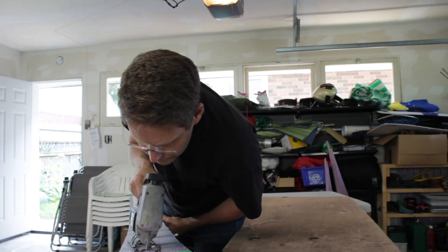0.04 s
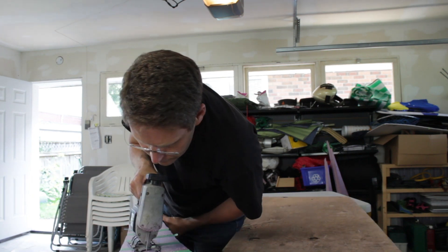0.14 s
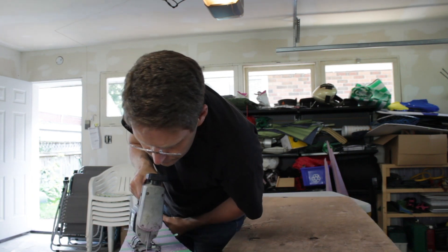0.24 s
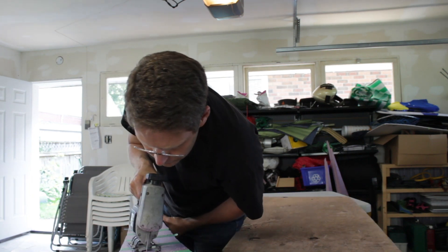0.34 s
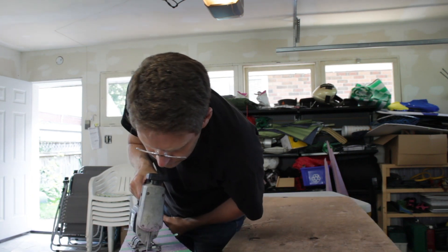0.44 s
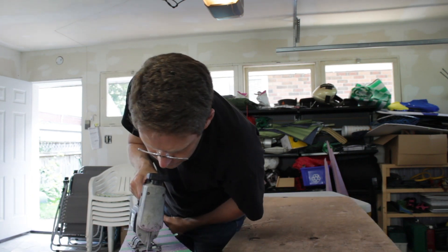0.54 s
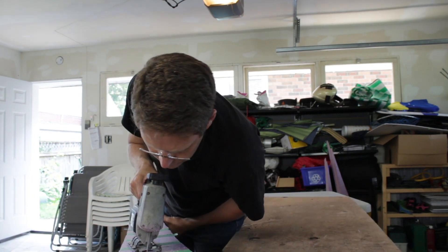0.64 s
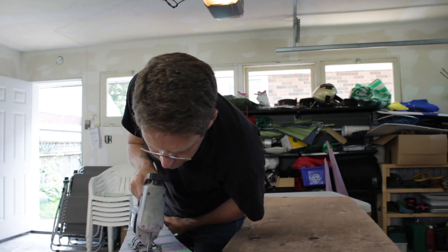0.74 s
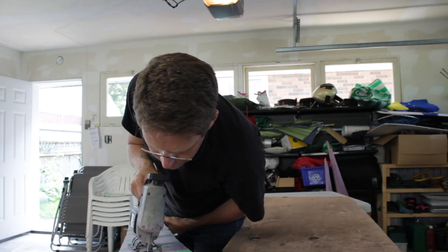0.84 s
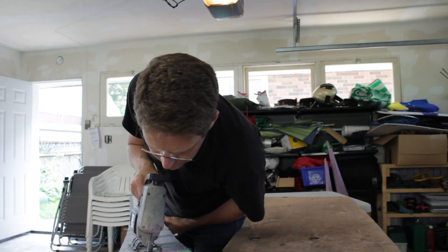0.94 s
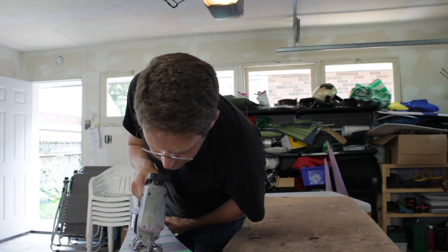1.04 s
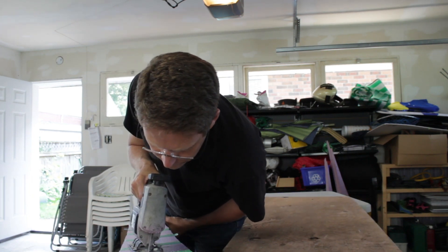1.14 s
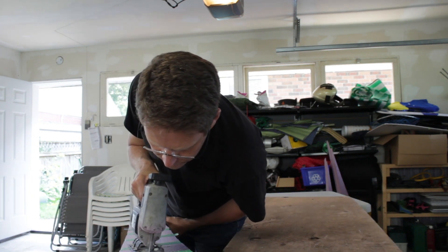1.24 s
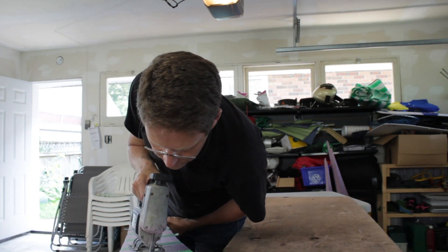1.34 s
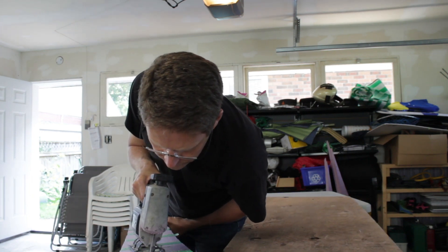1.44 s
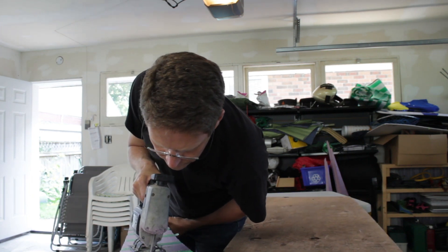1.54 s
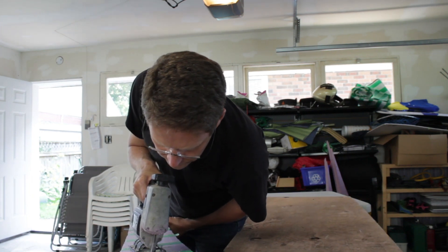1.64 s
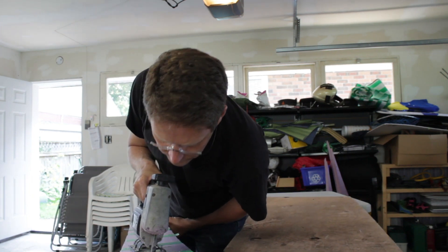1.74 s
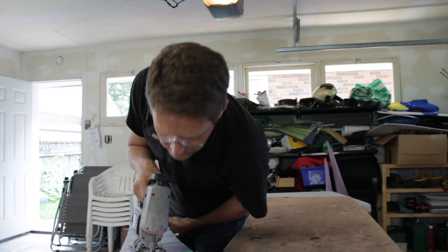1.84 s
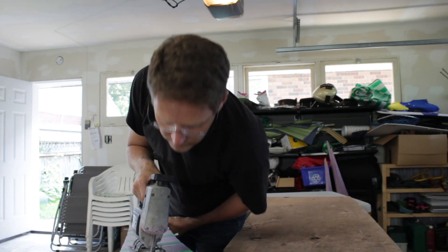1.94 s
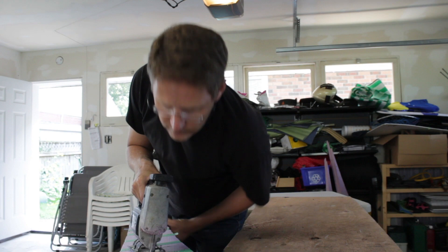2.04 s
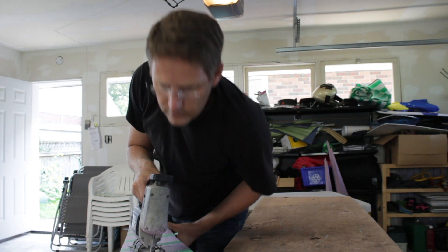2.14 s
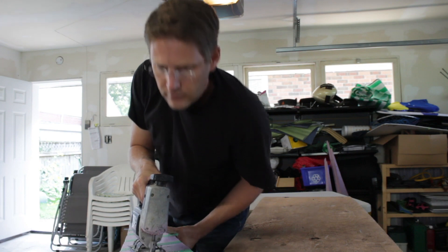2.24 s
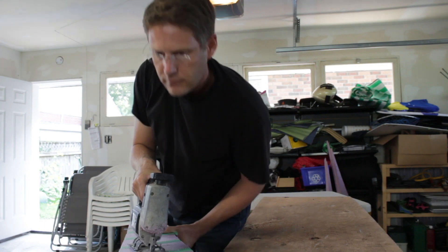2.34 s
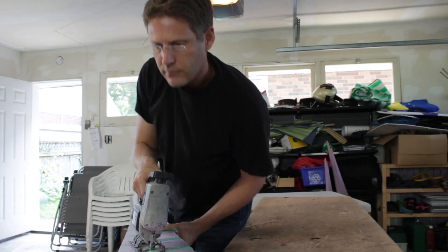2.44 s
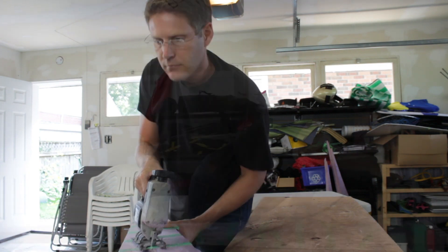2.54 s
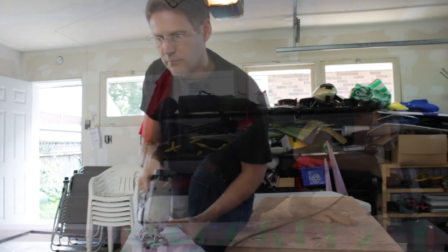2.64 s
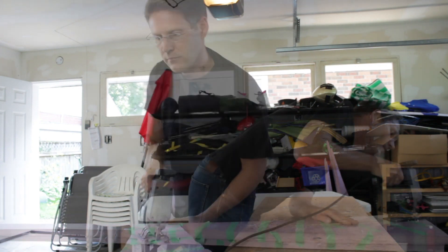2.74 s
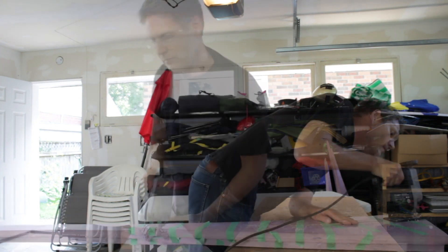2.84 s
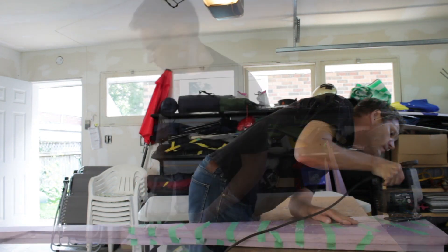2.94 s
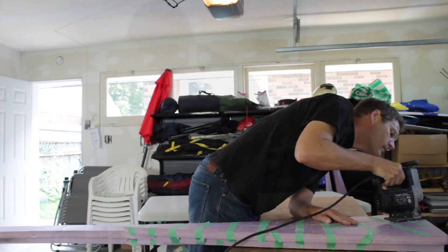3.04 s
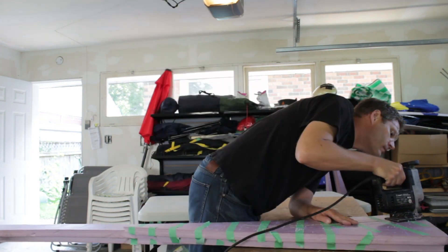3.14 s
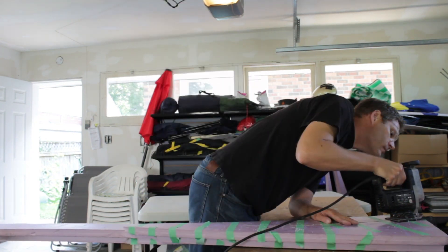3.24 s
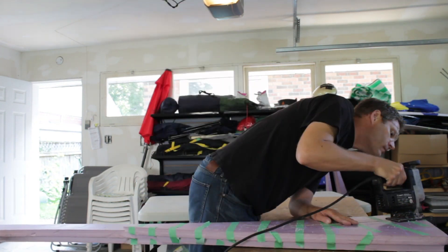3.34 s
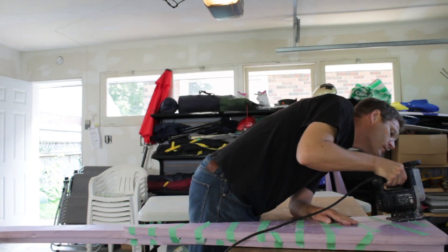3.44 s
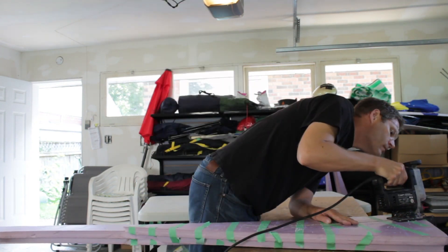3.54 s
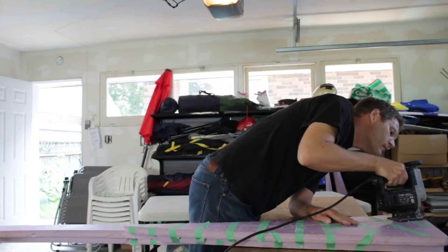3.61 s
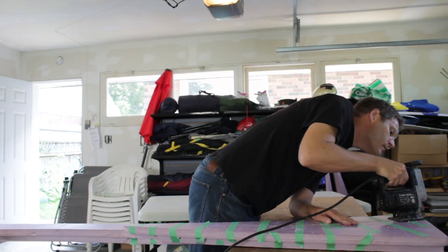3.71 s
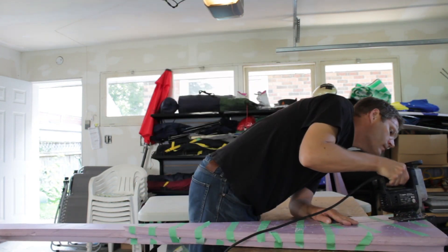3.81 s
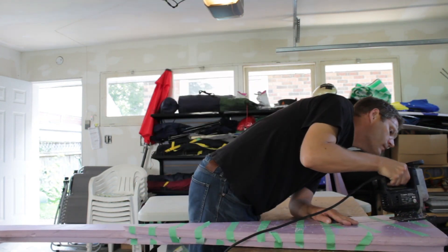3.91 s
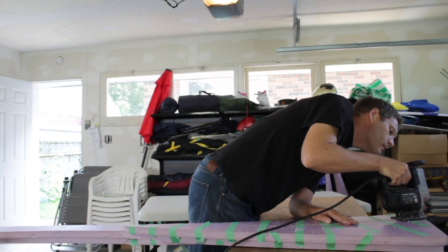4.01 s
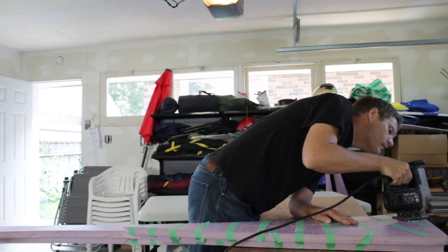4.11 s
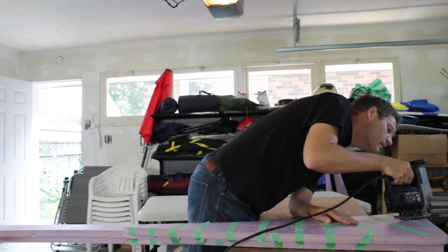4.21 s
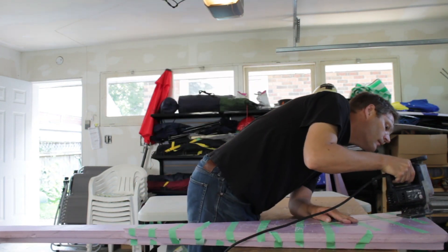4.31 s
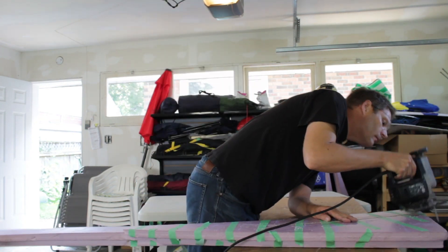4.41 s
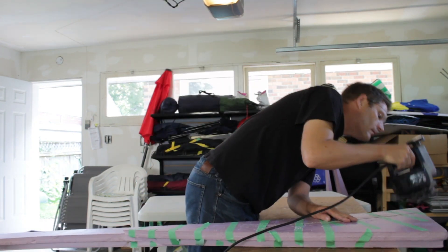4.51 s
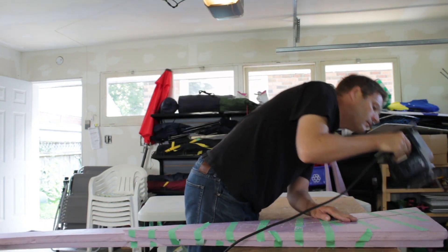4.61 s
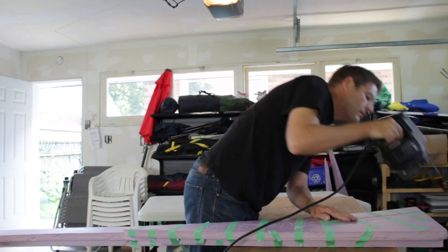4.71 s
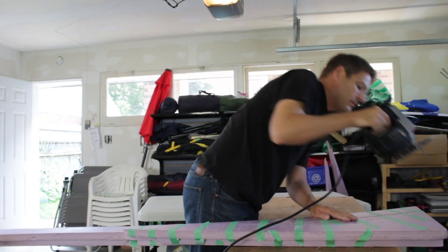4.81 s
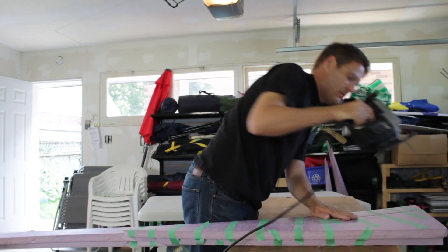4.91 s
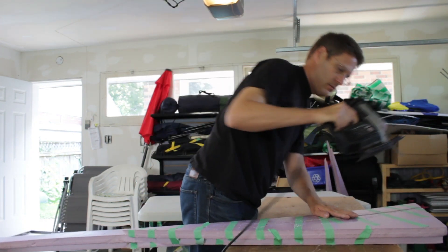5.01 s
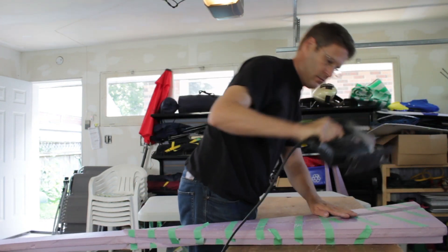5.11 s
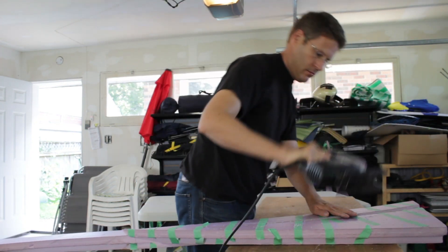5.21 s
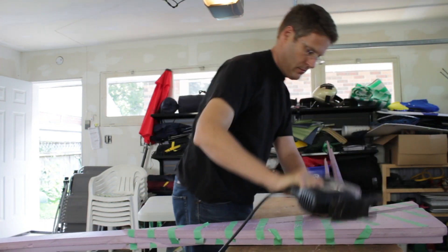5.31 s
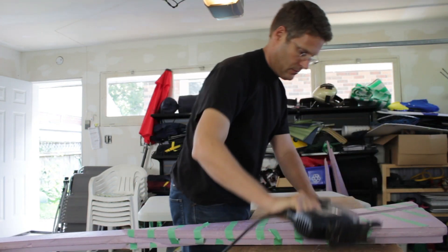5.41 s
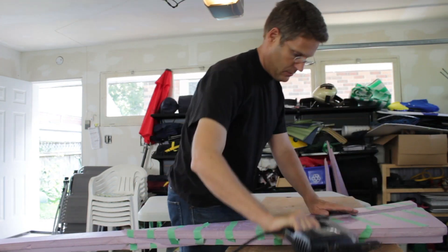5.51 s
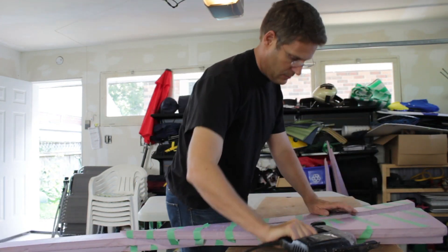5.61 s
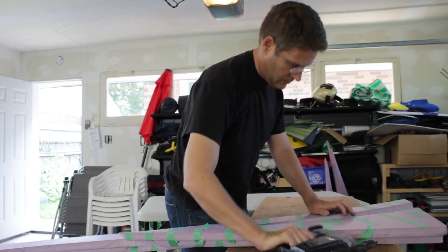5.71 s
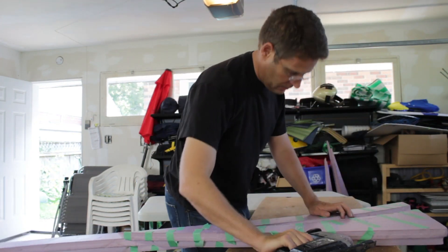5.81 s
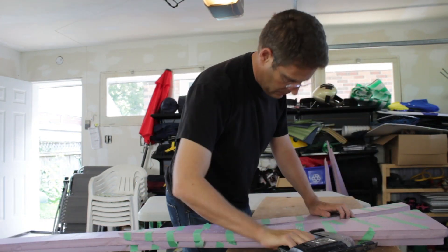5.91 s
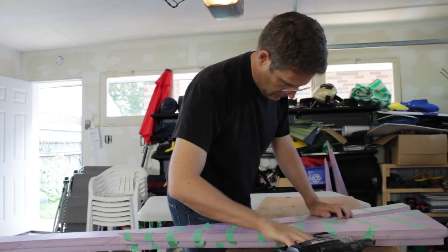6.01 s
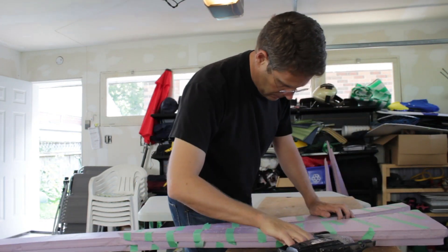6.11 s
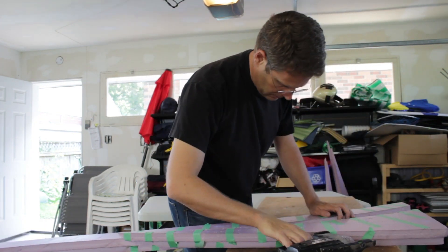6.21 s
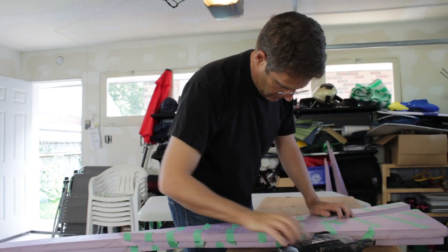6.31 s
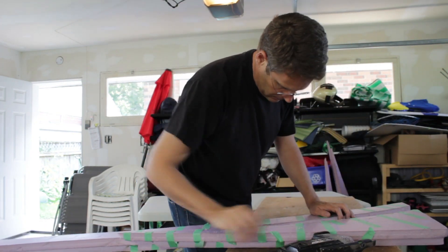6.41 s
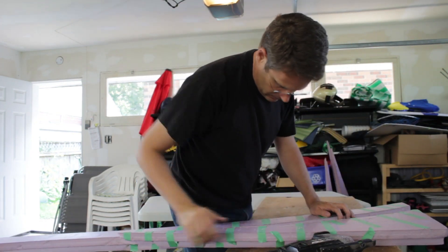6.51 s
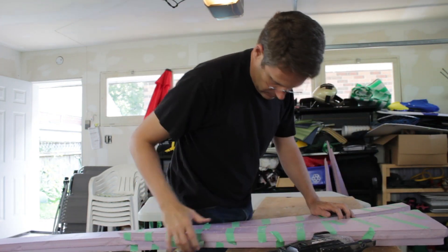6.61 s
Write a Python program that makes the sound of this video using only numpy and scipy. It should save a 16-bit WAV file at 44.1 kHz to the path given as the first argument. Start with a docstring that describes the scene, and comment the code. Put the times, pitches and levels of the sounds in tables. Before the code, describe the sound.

In a hard-walled garage, a jigsaw cuts foam board with a harsh, slapping chatter of about two dozen strokes a second. It slows, ticks and nearly stops. A faster, smoother buzz with a wavering whine starts abruptly, lifts free of the board and runs down. The saw is set down with a soft hollow clatter and slight rustling, then one crisp tap. Small microphone, thin bass.

```python
"""In a hard-walled garage a jigsaw cuts foam board: slow, the blade slapping the board, then a ticking run-down.
A faster, smoother cut with a drifting whine follows and runs down too; then the saw is set down on the board,
rocks, is shifted about, and the board is tapped once. Saw and board are coloured chatter, the sheet a comb
of stroke pulses, the blows short bursts on ringing modes. Random echoes answer all but the pumped sheet
and the faint air; the small microphone is thin in the bass.
"""
import sys
import numpy as np
from scipy import signal
from scipy.io import wavfile
from scipy.ndimage import uniform_filter1d

SR = 44100
rng = np.random.default_rng(int(sys.argv[2]) if len(sys.argv) > 2 else 0)


def master_out(mix):
    """Clip the mix to full scale and print it as 16-bit PCM to the path in sys.argv[1]."""
    frames = np.transpose(np.atleast_2d(mix))
    ceiling = np.clip(frames, -1, 1)
    pcm = np.round(ceiling * 32767).astype(np.int16)
    wavfile.write(sys.argv[1], SR, pcm)


N = 293687
T = np.arange(N) / SR
HZ = np.fft.rfftfreq(8192, 1 / SR)

# Levels in modes and colours are relative: each filter is scaled to energy 1.
# Saw, one table a cut: [t/s, gear rattle level/dB, fan and brush treble over the rattle level/dB]
SAW_LEVELS = [
    [(0.0, -22, -4), (0.26, -27.5, -2), (0.5, -22, -3.5), (1.1, -27.5, -3), (1.55, -25, -4.5),
     (1.81, -32, -3), (2.26, -35.5, -9), (2.4, -43, -7), (2.55, -51, 4)],
    [(2.46, -51, -1), (2.52, -40.5, -6), (2.8, -34, 1), (2.86, -20, -3), (3.61, -20, -2),
     (3.77, -20.5, -3.5), (3.9, -19, -1.5), (4.3, -22, -2.5), (4.6, -23.5, -4.5), (5.03, -22.5, -5.5),
     (5.21, -26, -10.5), (5.32, -35, -11), (5.45, -43, -3), (5.61, -46.5, -2.5)],
]
# Tool housing, each cut: in the foam, then lifted: [f/Hz, level/dB]
HOUSING_COLOURS = [
    [[(290, -45.5), (500, -9), (706, -6.5), (803, -3.5), (1510, 0), (1650, -3.5), (3630, -3.5),
     (4440, -10.5), (5200, -10.5), (9240, -13.5), (15500, -44)], [(290, -23), (500, -3.5), (901, -7.5),
     (997, -6), (3280, -6), (4500, -17), (5200, -15), (9370, -23.5), (15500, -52)]],
    [[(400, -21.5), (560, -8), (760, 1), (982, -1), (1090, 1.5), (1510, 1), (1650, -0.5), (3100, -2),
     (3740, -6.5), (8600, -18), (10200, -25.5), (15500, -55)], [(110, -48), (200, -29), (400, -19.5),
     (726, -7), (987, -5), (1100, -4.5), (1590, -0.5), (2430, 2.5), (5560, -0.5), (8930, -7.5),
     (13500, -34.5), (15500, -35)]],
]
# Gear case resonances, each cut: in the foam, then lifted: [f/Hz, width/Hz, level/dB]
CASE_RINGS = [
    [[(2600, 1200, -5), (3800, 480, -4), (5120, 670, 2), (5980, 130, 3), (7140, 240, -2)],
     [(1160, 190, -0.5), (2100, 73, 0), (3120, 16, -6), (5240, 120, -4)]],
    [[(1074.5, 11, 1.5), (1520, 31, -25), (2080, 10, 5.5), (2120, 26, -4), (2550, 130, -13),
     (3100, 110, -35), (3610, 72, -4.5)], [(1060, 42, -3), (1130, 670, 1.5), (1820, 110, 0), (2420, 59, -2),
     (3020, 220, -11)]],
]
# Saw leaves the foam and turns away, a row a cut: [start t/s, length t/s]
LIFTS = [(1.733, 0.14), (4.12, 0.56)]
# Rattle swing, a row a cut: [once a stroke/dB, twice a stroke/dB, slow chance/dB, quick rasp/dB]
THROBS = [(0.22, 1, 0.82, 0.53), (1.2, 0.21, 1, 0.66)]
# Blade speed: [t/s, strokes per s]
STROKE_RATES = [(0.0, 24.63), (0.45, 24.64), (0.9, 24.11), (1.35, 23.03), (1.8, 21.41), (2.4, 15),
                (2.5, 24), (2.85, 26.8), (3.35, 28.1), (3.66, 29.9), (4.01, 32.3), (4.5, 33.0), (5.2, 29),
                (5.6, 20)]
# Narrow bands sung by the gear case, one table a band: [t/s, level/dB, f/Hz]
WHINE_BANDS = [
    [(2.84, -30.5, 3020), (2.95, -34, 2985), (3.15, -25.5, 2970), (3.25, -44, 2960), (3.4, -34, 3070),
     (3.7, -38, 2880), (3.8, -50, 2860)],
    [(2.85, -28, 3080), (3.0, -34, 3140), (3.1, -27, 3120), (3.35, -36, 3210), (3.55, -29, 3130),
     (3.75, -37, 3200), (3.85, -35, 3120), (4.0, -38, 3050)],
    [(4.2, -40, 1030), (4.45, -37, 1084), (4.65, -33, 1093), (4.78, -35, 1247), (4.95, -32, 1157),
     (5.05, -55, 1170), (5.2, -37, 1034), (5.3, -40, 1140), (5.45, -57, 1120), (5.55, -62, 1100)],
]
# Width of each whine band: [width/Hz]
WHINE_WIDTHS = [49, 89, 91]
# Blade slaps the board in the first cut: [t/s, crack level/dB, treble level/dB, boom level/dB]
SLAP_BLOWS = [(0.0347, -12, -20, 6.5), (0.0734, -17, -18, 4), (0.1149, -9.5, -17, 8),
              (0.155, -16, -18, 5.5), (0.1974, -11, -21, 2), (0.213, -9, -11.5, -11),
              (0.2358, -15.5, -15, -3), (0.277, -31, -16.5, 3.5), (0.3183, -13, -22, 4),
              (0.3601, -10, -13, 3), (0.398, -11, -14.5, 12), (0.438, -8, -15, -1), (0.4799, -13, -14, 11),
              (0.5215, -12.5, -14.5, 5), (0.562, -10, -16, 9), (0.6025, -28, -17.5, 4.5),
              (0.6418, -18, -13, 3), (0.6821, -8.5, -14, 11.5), (0.7253, -11.5, -16, 10),
              (0.766, -13, -18, 11.5), (0.8065, -10, -16, -1), (0.848, -11.5, -18, 12.5),
              (0.8888, -21, -19, 5), (0.9315, -13, -16.5, 11), (0.9741, -9.5, -12.5, 11),
              (1.0145, -14, -18, 10), (1.058, -17, -16, -1), (1.0992, -9.5, -16, 7),
              (1.1435, -10.5, -18, 9.5), (1.187, -8, -17, 7.5), (1.2287, -11, -14, 7.5),
              (1.2709, -13, -12.5, 0), (1.314, -9.5, -15.5, 6), (1.3586, -12, -15, 8),
              (1.4005, -8, -26, 5.5), (1.4441, -10.5, -17, 11), (1.4877, -25, -16.5, 2),
              (1.532, -10.5, -13.5, 7), (1.578, -10.5, -14.5, 6), (1.6212, -17, -14, 3),
              (1.6686, -15.5, -21, 10.5), (1.7139, -13.5, -16.5, 8), (1.7618, -11.5, -18, 2)]
# Loose blade ticks: [t/s, crack level/dB, treble level/dB, boom level/dB, contact decay/s]
TICK_BLOWS = [(1.8976, -18.5, -29, -25, 0.0028), (1.939, -21, -17, -18, 0.0019),
              (1.99, -24, -28, -22, 0.007), (2.085, -29, -19.5, -24, 0.0043),
              (2.09, -15.5, -33, -29, 0.0026), (2.138, -26, -30, -9, 0.0064),
              (2.2135, -19, -17, -26, 0.0017), (2.3224, -33, -40, -9, 0.0027), (2.698, -36, -32, -30, .006)]
# Crack of the slapping blade, then of the tool body: [f/Hz, level/dB]
CRACK_COLOURS = [
    [(290, -32), (500, -41), (888, 4.5), (1650, -3.5), (2890, -1), (4380, -7.5), (5130, 0), (9240, -10),
     (12000, -27), (15500, -35)],
    [(250, -11), (600, 1.5), (1200, -6), (2800, -6.5), (4800, -14), (7200, -14), (10500, -23), (13500, -42),
     (15500, -47)],
]
# Crack of the blade ticks: [f/Hz, level/dB]
TICK_CRACK = [(300, -19), (900, -9), (2500, -7), (4300, -4), (5200, -1.5), (6500, -9), (7800, -10),
              (11000, -26), (15500, -48)]
# Strokes pump the sheet, each cut: low modes, then upper modes: [t/s, level/dB]
PUMP_LEVELS = [
    [(0.0, -43), (0.25, -57), (0.41, -43), (1.26, -42), (1.74, -39.5), (1.92, -58), (2.15, -53),
     (2.25, -68)],
    [(0.0, -45), (0.3, -40), (0.45, -30), (0.65, -30.5), (1.03, -35), (1.13, -29), (1.27, -32), (1.35, -27),
     (1.55, -31), (1.78, -39), (1.9, -50)],
    [(2.82, -58), (2.85, -41), (2.98, -47), (3.1, -44), (3.5, -46.5), (3.7, -44), (3.8, -57.5), (4.4, -52),
     (4.56, -64)],
    [(2.82, -49), (2.85, -33.5), (2.98, -37), (3.3, -40), (3.45, -33), (3.7, -36), (3.78, -53),
     (4.1, -47.5), (4.2, -43), (4.33, -40), (4.42, -54), (4.56, -52)],
]
# Sheet resonances, each cut: [f/Hz, width/Hz, level/dB]
SHEET_MODES = [
    [(72, 20, 7.3), (142, 21, 7.4), (225, 27, 3.2), (293, 18.4, 4.8), (325.4, 30, 2), (421.4, 52, 0.86)],
    [(140.3, 3.9, 5.5), (185.6, 30, 0.5), (265, 24, 6.5), (316.5, 35, -4), (454, 160, -2.5),
     (584.5, 25, 4.5)],
]
# Tool in each cut, then hands, shake the board: [t/s, level/dB]
CONTACT_LEVELS = [
    [(0.0, -29.5), (0.64, -33), (1.06, -34.5), (1.49, -28.5), (1.8, -37.5), (2.13, -43.5), (2.39, -51),
     (2.7, -46)],
    [(2.45, -79), (2.8, -45), (2.86, -34.5), (3.08, -27), (3.3, -31), (3.7, -36), (3.79, -34.5),
     (3.92, -36.5), (4.3, -41.5), (4.58, -49), (5.2, -51.5)],
    [(5.2, -48), (5.31, -40.5), (5.39, -36.5), (5.68, -50), (5.8, -45), (6.115, -44.5), (6.135, -45),
     (6.33, -50)],
]
# Low rumble of the board while the saw is set down and handled: [t/s, level/dB]
LOW_RUMBLE_LEVELS = [(5.2, -67), (5.3, -50), (5.45, -63), (5.58, -53), (5.75, -47), (6.0, -54), (6.2, -63)]
# Foam board resonances: [f/Hz, width/Hz, level/dB]
BOARD_MODES = [(143, 14, -11), (208, 103, -3), (286.5, 11.2, -0.5), (336.3, 49, 1.5), (396, 52, -4.5),
               (510, 60, -33), (680, 170, 2.5), (883.5, 55, 3.5), (1117, 180, -2), (1350, 326, -7)]
# Broad resonance of a shaken board: [f/Hz, width/Hz, level/dB]
BROAD_MODE = [(503, 330, -5)]
# Resonances of the board on its trestles: [f/Hz, width/Hz, level/dB]
TABLE_MODES = [(69.4, 17, 11), (156, 56, 2), (214, 24, -3), (306, 127, -0.5), (486, 140, -9),
               (734, 390, -5.5), (1060, 460, -9), (1280, 280, -5.5), (2060, 330, -11)]
# Saw lands and rocks: [t/s, crack level/dB, treble level/dB, boom level/dB, contact decay/s]
KNOCK_BLOWS = [(5.6175, -21, -33, 9.5, 0.0058), (5.625, -23, -37, 2.5, 0.005),
               (5.6345, -36, -36, -1, 0.0068), (5.6447, -27, -36, 7, 0.0073), (5.639, -27, -42, -1, 0.0044),
               (5.6538, -27, -42, -10, 0.006), (5.6655, -41, -42, 6.5, .009), (5.674, -39, -42, -11, .006),
               (5.6835, -33, -45, 5.5, 0.01), (5.691, -32, -46, -2, 0.0051), (5.701, -42, -46, -15, .005),
               (5.7108, -45, -37, -16, .004), (5.725, -41, -46, -13, .005), (5.756, -37, -35, -24, 0.005),
               (5.76, -30, -24.5, -24, 0.0049), (5.764, -34, -31, -3, 0.0047), (5.795, -31, -37, -5, 0.014),
               (5.8496, -47, -46, -8, 0.0035), (5.868, -46, -40, -11, 0.011),
               (5.924, -44, -30.5, -22, 0.003), (5.9567, -32, -43, -8.5, 0.0039)]
# Tap and its rebounds: [t/s, crack level/dB, treble level/dB, boom level/dB, contact decay/s]
TAP_BLOWS = [(6.1205, -27, -48, -22, 0.0026), (6.1225, -16, -28.5, -9, 0.0037),
             (6.129, -35, -34, -3, 0.004), (6.136, -35, -46, -7, 0.0046), (6.141, -29, -46, -15, 0.0094),
             (6.154, -36, -47, -3, .015), (6.175, -35, -47, -6, 0.017)]
# Crack of the tap: [f/Hz, level/dB]
TAP_CRACK = [(250, -26), (530, 4.5), (1000, -27), (1300, -5), (1600, -7), (2200, -1), (2800, -2),
             (3400, -4), (4200, -3.5), (4800, -13), (7200, -6), (10500, -23), (15500, -58)]
# Cord and sleeve drag on the foam: [t/s, level/dB]
RUSTLE_LEVELS = [(5.6, -44), (5.7, -40), (5.83, -41.5), (6.04, -43.5), (6.32, -66)]
# Colour of that drag: [f/Hz, level/dB]
RUSTLE_SPECTRUM = [(530, -30), (900, 3), (1060, -8), (1100, -7), (1300, 1.5), (3940, 1.5), (4550, -6),
                   (7230, -2.5), (15500, -31)]
# Garage air and yard: [f/Hz, level/dB]
AIR_SPECTRUM = [(18, -40), (30, -3), (75, -1), (105, -28), (130, 2), (505, 1.5), (561, -2), (1110, 2),
                (1820, -1.5), (2910, -2), (6200, -5.5), (7150, -3), (8200, -8), (13300, -25), (15500, -53)]
# Room decay: [f/Hz, t60/s]
GARAGE_DECAY = [(150, 0.49), (600, 0.46), (2500, 0.63), (6000, 0.57), (12000, 0.28)]

FIRST_STROKE = 0.14  # part of a stroke already done at the start
WHINE_FLUTTER_DB = 3  # rms
RAGGED, SLAP_RAGGED = 0.35, 0.4  # weight of chance in a push; the slaps chatter a little more
SLAP_DECAY_S = 0.0038
AIR_DB = -49
PATH_PEAKS_PER_S = 5  # how often each of three room paths peaks, in either sign
EDGE_HZ = 15500  # top of the microphone's band


def saw(rows, housing, rings, lift, throb):
    """Gear teeth chatter into the case, swelling with each stroke; fan and brush treble rides on top."""
    rattle_db, treble_db = curves(rows)
    turn = 2 * np.pi * strokes_done()
    stroke_db = throb[0] * np.cos(turn) + throb[1] * np.cos(2 * turn)
    chance_db = throb[2] * wander(21.0) + throb[3] * wander(176.0)
    teeth = grit(5000, 2.16) + 1.23 * rng.standard_normal(N)
    chatter = amp(stroke_db + chance_db) * teeth

    lifted = np.clip((T - lift[0]) / lift[1], 0, 1)
    shares = np.sqrt([1 - lifted, lifted])  # equal-power turn from one colour to the other
    out = 0
    for share, shell, ring in zip(shares, housing, rings):
        low, high = split(amp(read(shell, HZ)) * (1 + 1.03 * modes(ring)))
        rattle = evened(colour(chatter, low))
        treble = evened(colour(chatter, high))
        out = out + share * (rattle + amp(treble_db) * treble)
    return amp(rattle_db) * out


def strokes_done():
    """Blade travel in strokes: the running sum of its changing speed."""
    return FIRST_STROKE + np.cumsum(np.interp(T, *np.transpose(STROKE_RATES))) / SR


def whine(rows, width):
    """Tooth chatter is held by a narrow, drifting resonance of the gear case and flutters."""
    level_db, hz = curves(rows)
    turn = np.exp(2j * np.pi * np.cumsum(hz) / SR)
    r = np.exp(-np.pi * width / SR)
    # shift the band to zero, filter it there, then shift it back
    held = signal.lfilter([1], [1, -2 * r, r * r], grit(2700, 3.2) / turn) * turn
    return amp(level_db + WHINE_FLUTTER_DB * wander(31)) * evened(held.real)


def blows(rows, body, crack, ragged, rise, snap):
    """Each blow is a short ragged burst that cracks, and a push that sets the body ringing."""
    trains = np.zeros((3, N))  # crack, treble, boom
    t = T[:3000]
    push = np.exp(-((t - rise) / 0.00039) ** 2)
    push = push / push.sum()
    for s, crack_db, treble_db, boom_db, decay in rows:
        envelope = np.exp(-t / max(decay, 0.0005)) * np.minimum(t / rise, 1)
        burst = rng.standard_normal((3, len(t))) * envelope
        burst[:2, round(rise * SR)] += snap  # one hard first contact
        burst[2] = ragged * burst[2] / np.linalg.norm(burst[2]) + push
        levels = amp([[crack_db], [treble_db], [boom_db]])
        trains[:, round(s * SR):][:, :len(t)] += levels * burst
    low, high = split(amp(read(crack, HZ)))
    return sum(map(colour, trains, (low, high, modes(body))))


def pumped_sheet(rows, sheet):
    """One like push a stroke: a comb of tones that slides through the modes of the sheet."""
    jittered = strokes_done() + 0.012 * wander(40)
    pushes = np.diff(np.floor(jittered), prepend=0)
    pushes = pushes * amp(1.23 * wander(33))
    return amp(curves(rows)[0]) * evened(colour(pushes, modes(sheet)))


def shaken_board(rows, body):
    """Uneven pushes keep the light board booming."""
    pushes = grit(1500, 2.0) * amp(1.5 * wander(20))
    return amp(curves(rows)[0]) * evened(colour(pushes, modes(body)))


def rustle():
    """Cord and sleeve drag on the foam as a fine crackle of random clicks."""
    crackle = colour(grit(9000, 2.4), amp(read(RUSTLE_SPECTRUM, HZ)))
    return amp(curves(RUSTLE_LEVELS)[0]) * evened(crackle)


def garage(x):
    """Sparse echoes of random sign die at a speed set by pitch; three paths take turns, so blows ring unlike."""
    taps = np.zeros((3, SR))
    at = np.arange(260, SR - 20, 20)  # one echo in every 20 samples
    at = at + rng.integers(0, 20, (3, len(at)))
    np.put_along_axis(taps, at, rng.choice([-1., 1.], at.shape), axis=1)

    hz, t, bands = signal.stft(taps, SR, nperseg=256)
    decay = amp(-60 * t / read(GARAGE_DECAY, hz)[:, None])
    tails = signal.istft(bands * decay, SR, nperseg=256)[1]
    tails = tails / np.linalg.norm(tails[0])

    phase = PATH_PEAKS_PER_S * T / 2 + np.arange(3)[:, None] / 3
    turns = np.sqrt(2 / 3) * np.cos(2 * np.pi * phase)
    return signal.fftconvolve(x * turns, tails, axes=1)[:, :N].sum(axis=0)


def air():
    """Garage air and yard are a faint noise wash with slight slow swells."""
    wash = colour(rng.standard_normal(N), amp(read(AIR_SPECTRUM, HZ)))
    return amp(AIR_DB + 0.32 * wander(8.1)) * evened(wash)


def amp(db):
    """Amplitude ratio of a level in dB."""
    return 10 ** (np.asarray(db) / 20)


def evened(x):
    """Scale to rms 1."""
    return x / np.sqrt(np.mean(x ** 2) + 1e-20)


def read(points, hz):
    """Read a table over frequency, straight between points on a log axis."""
    f, value = np.transpose(points)
    return np.interp(np.log(hz + 1), np.log(f + 1), value)


def curves(rows):
    """Columns over time; the first one, a level in dB, falls to -120 outside the table."""
    s, level, *rest = np.transpose(rows)
    level_db = np.interp(T, s, level, left=-120, right=-120)
    return [level_db] + [np.interp(T, s, column) for column in rest]


def modes(rows):
    """Gain of a set of resonances, summed in power; a light panel sheds little deep bass."""
    peaks = sum((amp(db) / (1 + (2 * (HZ - hz) / width) ** 2)) ** 2 for hz, width, db in rows)
    return np.sqrt(peaks / (1 + (125 / (HZ + 1)) ** 9))


def split(gain):
    """Part a gain at 4.7 kHz in power; the lower part also loses its bass below 250 Hz."""
    share = 1 / (1 + (HZ / 4700) ** 8)
    low = gain * np.sqrt(share / (1 + (250 / (HZ + 1)) ** 6))
    return low, gain * np.sqrt(1 - share)


def colour(x, gain):
    """Causal minimum-phase filter of energy 1, shaped by the given gain."""
    log = np.log(np.maximum(gain, 1e-5 * gain.max()))
    circle = signal.hilbert(np.r_[log, log[-2:0:-1]])
    taps = np.fft.ifft(np.exp(circle.conj())).real[:4096]
    return signal.oaconvolve(x, taps / np.linalg.norm(taps))[:N]


def wander(hz):
    """Slow chance of rms 1: noise averaged twice over 1/hz."""
    width = int(SR / hz)
    once = uniform_filter1d(rng.standard_normal(N), width)
    return evened(uniform_filter1d(once, width))


def grit(per_s, spread_db):
    """Random clicks of uneven size and sign, scaled to rms 1."""
    size = amp(spread_db * np.minimum(rng.exponential(1, N), 5))
    size = size * rng.choice([-1., 1.], N)
    return evened(size * (rng.random(N) < per_s / SR))


def scene():
    """Direct sound of saw, board and blows, with the echoes of the garage and its air behind."""
    tool = sum(map(saw, SAW_LEVELS, HOUSING_COLOURS, CASE_RINGS, LIFTS, THROBS))
    tool = tool + sum(map(whine, WHINE_BANDS, WHINE_WIDTHS)) + rustle()

    first_sheet, second_sheet = SHEET_MODES
    slap_rows = [(*row, SLAP_DECAY_S) for row in SLAP_BLOWS]
    # the pumped sheet carries the low modes; the slaps ring these
    slap_body = BOARD_MODES[3:5] + BOARD_MODES[6:]
    slaps = blows(slap_rows, slap_body, CRACK_COLOURS[0], SLAP_RAGGED, rise=0.00202, snap=0.79)
    slaps = slaps + blows(TICK_BLOWS, BOARD_MODES[2:], TICK_CRACK, RAGGED, rise=0.00113, snap=1.3)

    pumped_modes = first_sheet[:3], first_sheet[3:], second_sheet[:2], second_sheet[2:]
    pumped = sum(map(pumped_sheet, PUMP_LEVELS, pumped_modes))

    # first cut, second cut, hands, low rumble
    shaken_modes = (BOARD_MODES + BROAD_MODE, second_sheet[3:] + BROAD_MODE,
                    TABLE_MODES + BROAD_MODE, TABLE_MODES[1:3])
    board = sum(map(shaken_board, CONTACT_LEVELS + [LOW_RUMBLE_LEVELS], shaken_modes))

    knocks = blows(KNOCK_BLOWS, TABLE_MODES, CRACK_COLOURS[1], RAGGED, rise=0.0007, snap=1.2)
    tap = blows(TAP_BLOWS, TABLE_MODES[2:], TAP_CRACK, RAGGED, rise=0.00105, snap=3.4)

    to_room = amp(-11.5) * (tool + board) + amp(-5.5) * slaps
    to_room = to_room + amp(-2.5) * knocks + amp(-6.0) * tap
    direct = tool + board + pumped + slaps + knocks + tap
    return (direct + garage(to_room) + air())[None]


def record(dry):
    """The small microphone drops the deep bass; then the band limit."""
    thin = signal.sosfilt(signal.butter(2, 90, "high", fs=SR, output="sos"), dry)
    band = signal.firwin(511, EDGE_HZ, window=("kaiser", 9), fs=SR)
    return signal.oaconvolve(thin, band[None], "same")


dry = scene()
out = record(dry)
master_out(out)
```